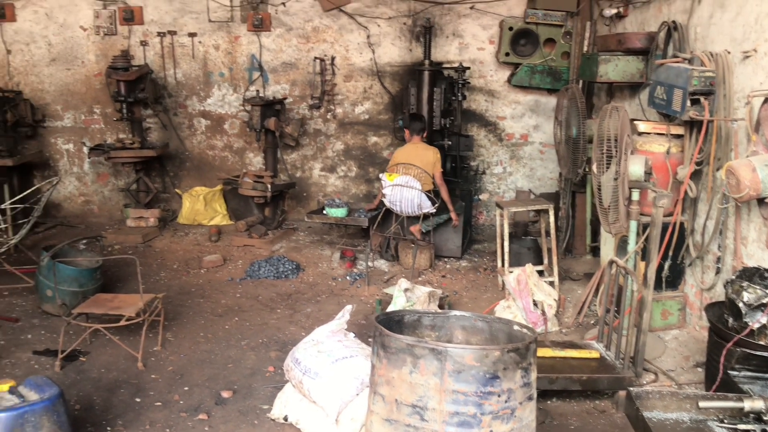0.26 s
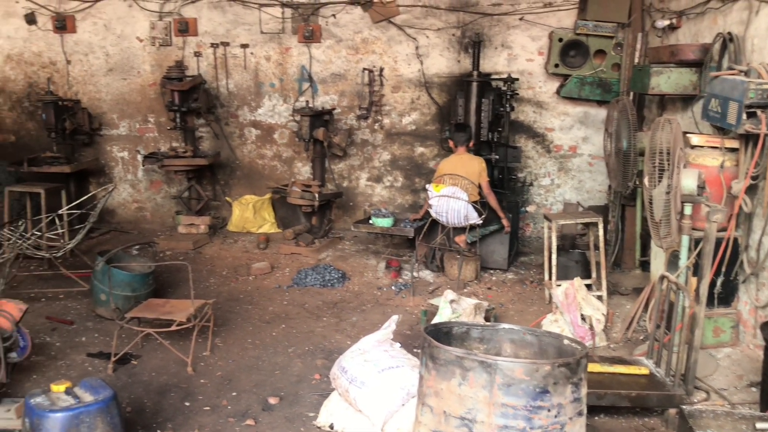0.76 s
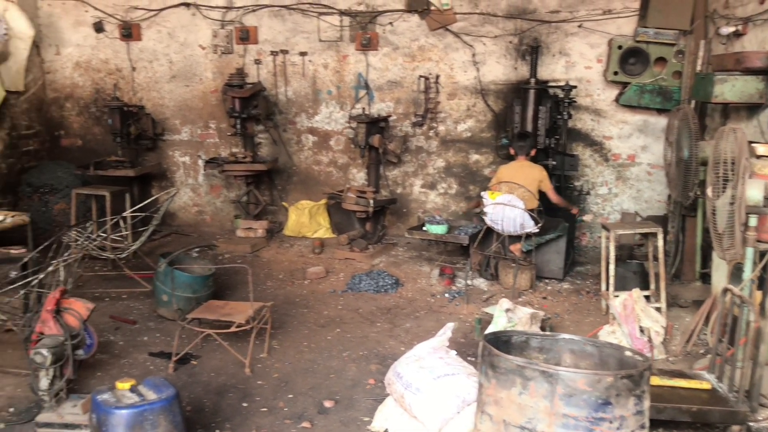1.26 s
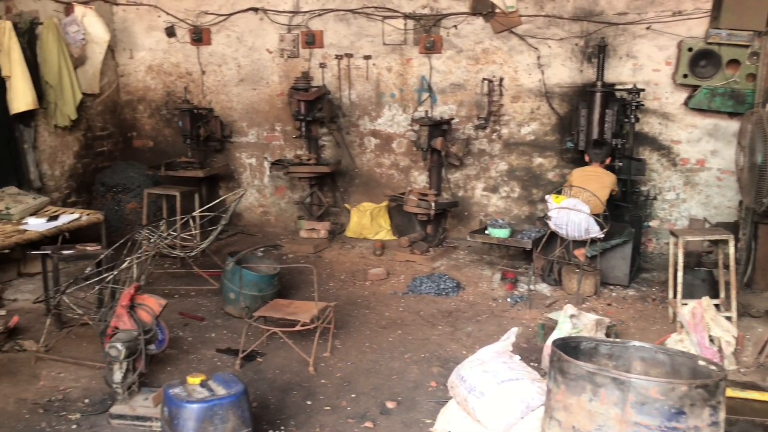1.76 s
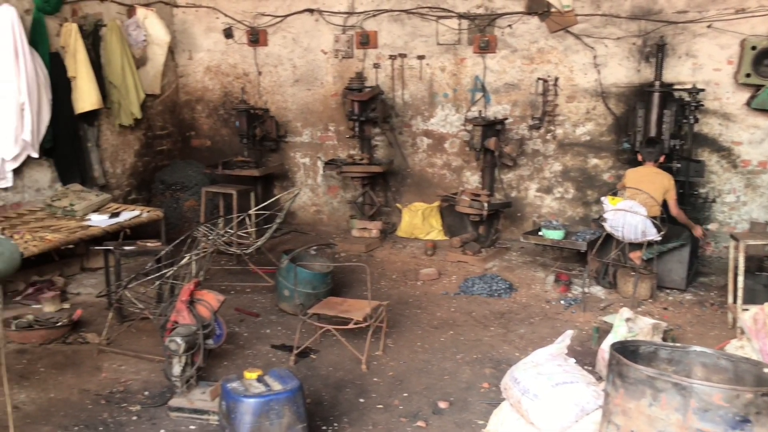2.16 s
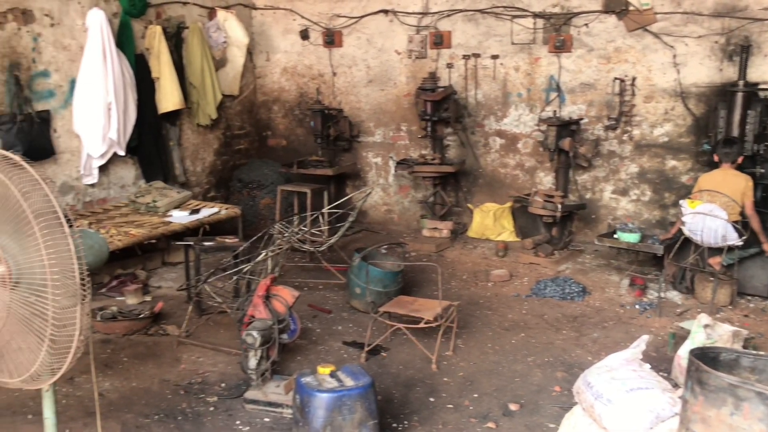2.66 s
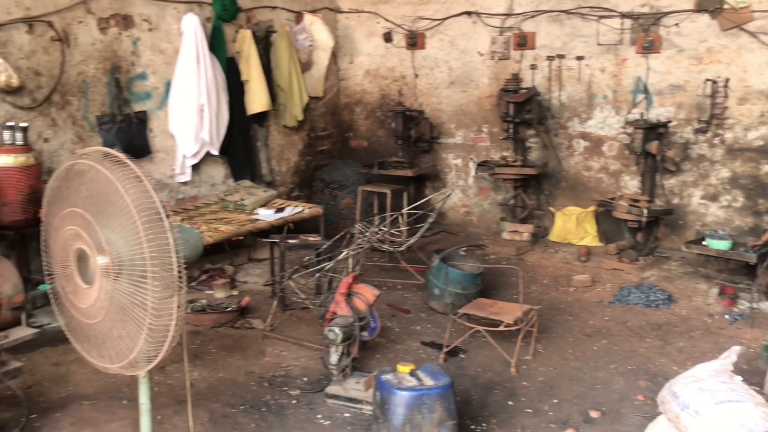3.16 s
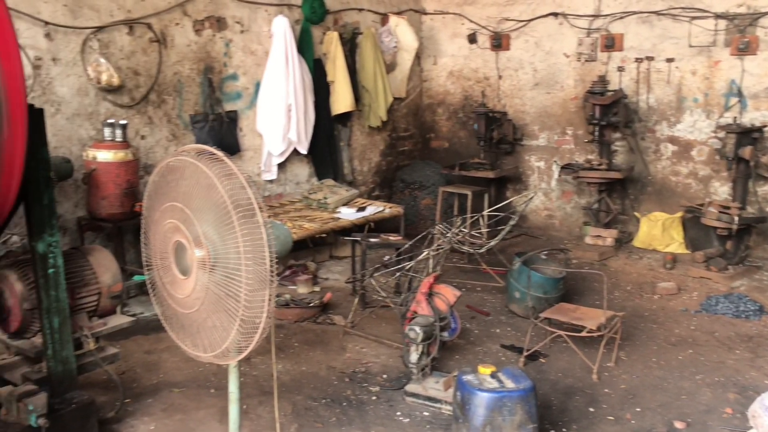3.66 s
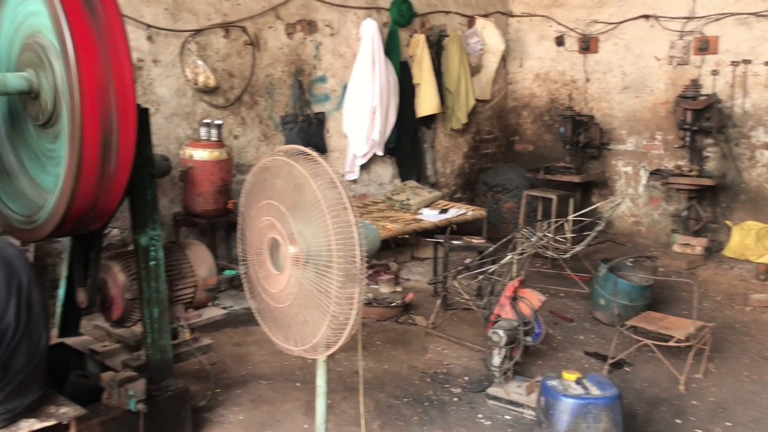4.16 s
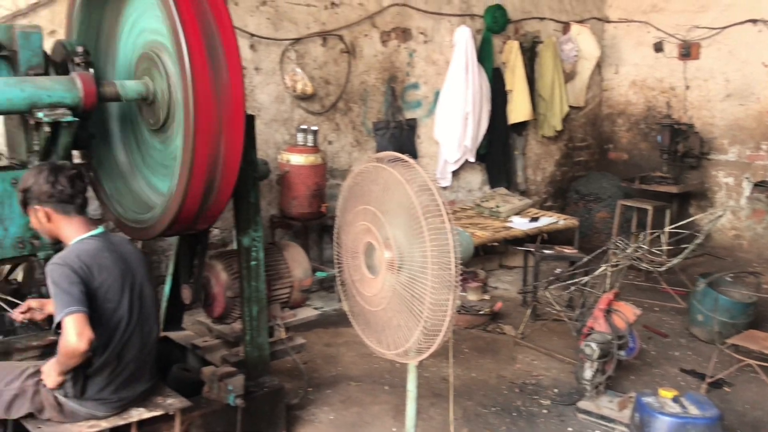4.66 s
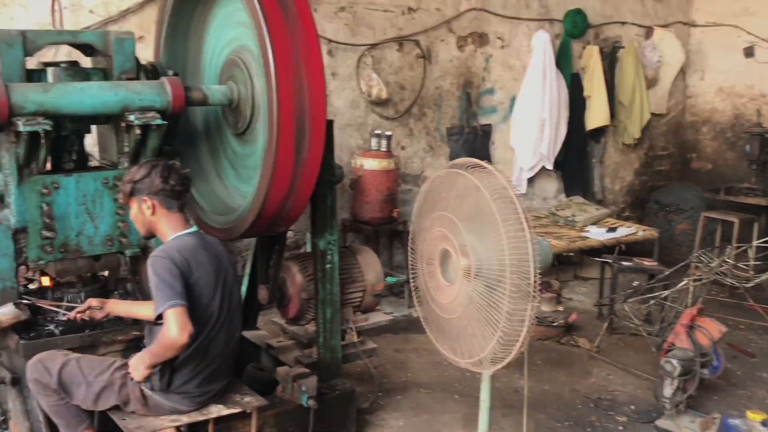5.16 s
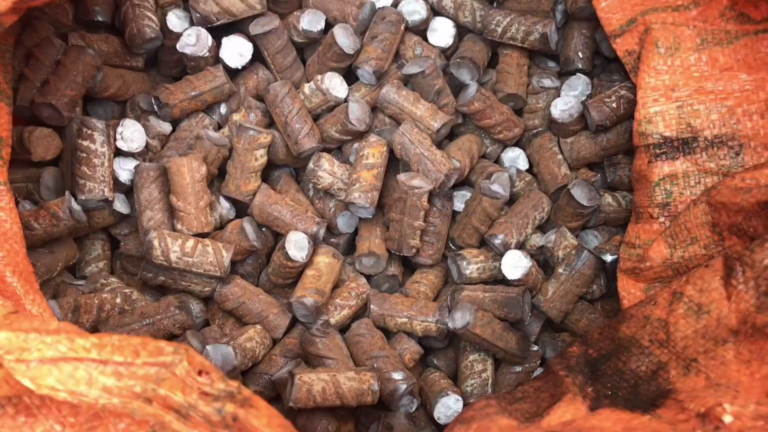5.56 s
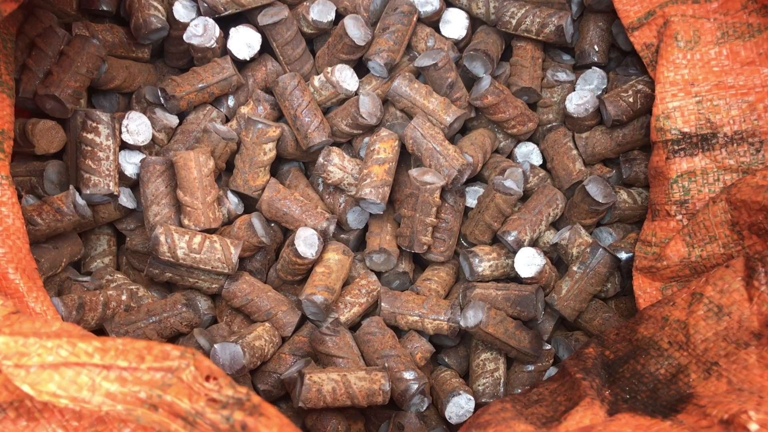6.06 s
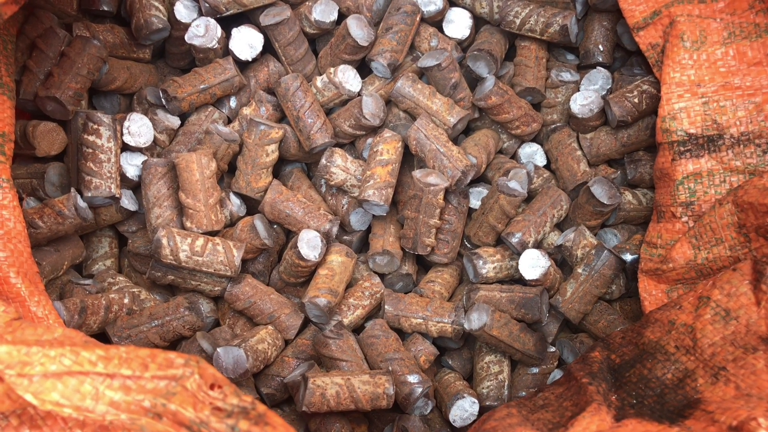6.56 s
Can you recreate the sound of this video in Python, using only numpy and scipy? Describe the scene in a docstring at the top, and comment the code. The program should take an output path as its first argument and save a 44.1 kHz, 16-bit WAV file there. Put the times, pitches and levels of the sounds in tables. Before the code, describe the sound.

A belt-driven press runs from the start in a small workshop, heard in mono with short reflections from close walls. Its motor hums and its belt hisses, while a low flywheel rumble and a bearing rattle swell gently about every 1.4 seconds. Steel bars knock, chatter and ring against the frame in irregular bursts: around 0.8 to 1.3 seconds, 2.1 to 2.6, 3.4 to 4, and 4.7 to 5.3. A loose plate rings with some blows, most clearly near 2.2 seconds. Dull bumps land around 0.3, 1.3 and 2.9 to 3.3 seconds. Bars slide with a thin hiss near 0.8, 1.6, 3.2 and 3.8 seconds. A bearing squeals faintly around 3.1, 4.4 and 4.7 seconds. At about 5.4 seconds the din cuts off abruptly, leaving only faint room tone until the end, near 7 seconds.

```python
"""Shearing press in a brick workshop

One microphone, mono, in a small shop with the walls close by. Steel bars knock, chatter and ring against
the frame of a belt-driven press in irregular bursts, and now and then slide with a thin hiss. Behind
them the motor hums, while flywheel rumble and bearing rattle swell with each stroke.
The din stops abruptly and leaves only faint room tone."""
import sys
import numpy as np
from scipy import signal
from scipy.fft import rfft, irfft
from scipy.io import wavfile
from scipy.ndimage import uniform_filter1d

SR = 44100
rng = np.random.default_rng(int(sys.argv[2]) if len(sys.argv) > 2 else 0)


def bounce(signal):
    """Save signal as a 16-bit WAV file at the path given by the first command-line argument."""
    frames = np.transpose(np.atleast_2d(signal))
    limited = np.clip(frames, -1, 1)
    pcm = np.round(limited * 32767).astype(np.int16)
    wavfile.write(sys.argv[1], SR, pcm)


N = 300762
T = np.arange(N) / SR
AGE = T[:SR * 2 // 5]  # seconds since a contact

# Ringing of the press frame and of a bar. Each row: pitch in Hz, relative level in dB, t60 in seconds.
FRAME_MODES = [(365.5, 1, 0.14), (518.7, 2.5, 0.13), (620, -6, 0.48), (655, 0.5, 0.2), (718.81, -3, 0.1),
               (856, 1, 0.14), (966, -6.5, .12), (1176, 3.5, 0.21), (1445.1, -1, 0.22), (2127, -3.5, 0.32),
               (2332, -5.5, 0.09), (2540, -11, 0.067), (2800, -3.5, 0.059)]
BAR_MODES = [(2500, 3, 0.071), (2567, 1.5, 0.15), (2715, 1.5, 0.11), (2920, -7, .1), (3783, -2.5, .16),
             (3981.2, -8, .13), (4720, -9, .12), (5280, -4.5, 0.12), (5310, -5, 0.13), (6250, -6.5, 0.18),
             (6350, -6.5, 0.13), (7100, -8.5, 0.14), (9600, -13, .1), (13170, -10.5, .09)]
# The dense, unresolved resonances of a clank. Each row: frequency in Hz, relative level in dB.
WASH_SPECTRUM = [(88, -35.5), (150, 4.5), (197, -10.5), (360, -3.5), (472, -9), (585, -7), (880, -5.5),
                 (1740, -12), (2560, 1.5), (3300, -17), (4960, -18.5), (5370, -14.5), (7760, -24.5),
                 (13100, -21.5), (15600, -32.5)]

def clank(hardness_db, ring_db):
    """Chattering steel excites frame and bar. Harder contacts trade thud for treble."""
    contacts = chatter()
    wash = colour(rng.standard_normal(len(AGE)), WASH_SPECTRUM)

    def register(lo_hz, hi_hz, t60):
        """One band of the wash, with the longer tail of the room."""
        return band(wash, lo_hz, hi_hz, order=3) * (fade(t60) + undb(-18) * fade(0.51))

    bite = undb(1.7 + 0.45 * hardness_db) * unit(register(1900, 3160, t60=0.28))
    middle = unit(register(782, 1800, t60=0.25))
    body = unit(middle + bite) + undb(-6.5) * unit(ring(FRAME_MODES))
    thud = struck(contacts, register(230, 790, t60=0.28), db=-4.5 - 0.69 * hardness_db)
    clang = struck(contacts, body, db=4)
    # the bright edge builds a little later than the body
    clash = struck(contacts, register(3000, 9000, t60=0.18), db=-2.5 + 0.52 * hardness_db, rise_s=0.008)
    tick = struck(contacts, register(9000, 15000, t60=0.083), db=-9 + 0.66 * hardness_db, rise_s=0.008)
    # the bar springs clear and rings on with its own rebounds
    rebounds = chatter(rebound=0.7)
    bar = ring(BAR_MODES, scatter_db=2, detune=0.006, walls_db=-1)
    clink = struck(rebounds, bar, ring_db, rise_s=0.006)
    return thud + (clang + clash + tick + clink) * grit()

def chatter(length_s=0.03, rebound=0.69, count=7):
    """A first contact and a few weaker rebounds."""
    contacts = np.zeros(int(length_s * SR) + 2)
    contacts[0] = 1
    for when, size in rng.random((count, 2)):
        contacts[int(when * length_s * SR) + 1] += (2 * size - 1) * np.exp(-when) * rebound
    return contacts

def ring(modes, scatter_db=-0.5, detune=0.0044, walls_t60=0.34, walls_db=0):
    """Each blow reweights and detunes the modes; the microphone hears them direct and off the walls."""
    partials = np.array([undb(db) * fade(t60) * np.exp(2j * np.pi * hz * AGE) for hz, db, t60 in modes])
    size, phase, shift = rng.standard_normal((3, len(modes)))
    weights = undb(scatter_db * size) * np.exp(2j * np.pi * phase)
    tone = (weights[:, None] * partials).imag.sum(axis=0)
    direct = np.interp(AGE * (1 + detune * shift[0]), AGE, tone)
    return unit(direct) + undb(walls_db) * unit(reflections(direct, walls_t60))

def struck(contacts, body, db, rise_s=0.0032):
    """A body's answer to all contacts takes a moment to build; its level is set on the first 40 ms."""
    build = 1 - np.exp(-AGE / rise_s)
    answer = signal.fftconvolve(contacts, body * build)[:len(AGE)]
    return undb(db) * unit(answer, count=1764)

def grit(spread_db=1.3, catch_s=0.004):
    """Tiny catches make the level uneven as steel grates during a blow."""
    sizes = rng.standard_normal(512)
    return undb(spread_db * np.interp(AGE / catch_s, np.arange(len(sizes)), sizes))

# Bars striking the press. Each row: start in seconds, strength in dB, hardness of the contact in dB,
# free ring of the bar in dB relative to the strength.
BAR_BLOWS = [(.146, -36, -16, -15), (.252, -31, -17, -19.5), (.763, -19, -4, -16), (.792, -20, 7, -6),
             (.827, -18.5, -6, -14), (.856, -22.5, -3, -15.5), (.937, -23.5, -8.5, -10),
             (1.196, -19, -3.5, -3.5), (1.233, -22, 5, 1), (1.27, -22, -8, -3.5), (1.318, -18, 1, -9.5),
             (1.486, -34.5, -22, -10), (1.643, -29, 13, -19), (2.088, -26.5, 11.5, -1.5),
             (2.109, -24, 16, 3), (2.224, -20, 0, -2.5), (2.29, -31, 3, 2.5), (2.353, -20, -7, -11),
             (2.391, -23, 11, -3), (2.434, -20, -4.5, -7.5), (2.465, -23, 3, -6.5), (2.589, -20, -4.5, -23),
             (2.805, -36, -9, -10.5), (2.856, -28, -7, -11.5), (2.924, -28.5, -11.5, -20),
             (3.427, -22, -8, -10.5), (3.452, -21, 6.5, -2.5), (3.494, -18, -5, -18.5),
             (3.53, -21.5, 5, -12), (3.564, -25.5, -2, -3), (3.675, -30, 3, -6), (3.84, -22.5, 3, -5.5),
             (3.884, -19, 4, 1.5), (3.929, -22, -1.5, 0.5), (3.986, -16.5, -6, -15),
             (4.317, -30.5, 17, -14), (4.706, -19.5, -2, -9), (4.946, -20, -7, -20.5),
             (4.966, -23, 5, -4.5), (5.071, -16.5, 4.5, -12.5), (5.11, -20, -8, -14.5),
             (5.255, -19, -7, -12.5), (5.274, -23, -9.5, -19), (5.368, -31, 9, -17.5)]

def bar_blows():
    """Steel bars knock against the frame in irregular bursts."""
    out = np.zeros(N)
    for start, db, hardness_db, ring_db in BAR_BLOWS:
        add(out, start, undb(db) * clank(hardness_db, ring_db))
    return out

# Ringing of a steel plate. Each row: pitch in Hz, relative level in dB, t60 in seconds.
PLATE_MODES = [(852, -2, 0.32), (937, -5, .15), (1340, -1.5, .18), (1525, -7, 0.22), (2560, 5.5, 0.055)]
# Knocks on that plate. Each row: start in seconds, level in dB.
PLATE_KNOCKS = [(.827, -31), (1.233, -26), (2.108, -19.5), (2.223, -16), (2.246, -28.5), (2.465, -23),
                (3.494, -24), (3.841, -19.5)]

def loose_plate():
    """A loose plate is caught, chatters and rings."""
    out = np.zeros(N)
    for start, db in PLATE_KNOCKS:
        add(out, start, struck(chatter(), ring(PLATE_MODES), db))
    return out

# A bar sliding over steel. Each row: start in seconds, length in seconds, level in dB.
BAR_SLIDES = [(.79, 0.22, -19.5), (1.51, 0.13, -27), (1.617, 0.093, -24.5), (3.107, 0.1264, -30),
              (3.167, 0.15, -17), (3.788, 0.1506, -23.5), (4.146, 0.15, -36)]

def bar_slides():
    """Tiny catches of the ribbed surface hiss as a bar starts quickly, then slows down."""
    out = np.zeros(N)
    for start, length_s, db in BAR_SLIDES:
        friction = rng.standard_normal(len(AGE))
        catches = friction * undb(2 * np.repeat(rng.standard_normal(len(AGE)), 100)[:len(AGE)])
        hiss = unit(band(catches, 11300, 14000)) + undb(-11) * unit(band(catches, 3500, 7800))
        speed = (1 - np.exp(-AGE / 0.01)) * np.exp(-2 * (AGE / length_s) ** 2)
        add(out, start, undb(db) * speed * hiss)
    return out

# Dull bumps of the press bed. Each row: start in seconds, pitch in Hz, level in dB.
BED_BUMPS = [(0.283, 257, -12.5), (.693, 246, -29), (.94, 300.9, -27), (1.29, 305, -8), (2.928, 272, -9.5),
             (3.185, 185.3, -12), (3.25, 310, -12)]

def bed_bumps(t60=0.1, rise_s=0.003):
    """A soft heavy contact swings one low, well damped resonance."""
    out = np.zeros(N)
    for start, hz, db in BED_BUMPS:
        swing = np.sin(2 * np.pi * hz * AGE) * fade(t60) * (1 - np.exp(-AGE / rise_s))
        add(out, start, undb(db) * swing)
    return out

def drive(stroke_s=1.353, full_load_s=1.023):
    """Rumble, rattle and hiss swell with the load once a stroke; rumble and rattle briefly ease off."""
    load = np.cos(2 * np.pi * (T - full_load_s) / stroke_s)
    ease = swell(peak_s=4.5, half_s=0.33)
    rumble = undb(-25 + 1.4708 * load - ease) * flywheel_rumble()
    rattle = undb(-24.5 + 2 * load - 3.5 * ease) * bearing_rattle()
    hiss = undb(-34 + 1.7 * load) * belt_hiss()
    return rumble + rattle + hiss

# Resonances of flywheel, belt and frame. Each row: centre in Hz, width in Hz, relative gain in dB.
RUMBLE_BANDS = [(54.8, 9.9, 0.5), (90, 15, 1.5), (113, 9.2, 2.5), (130.4, 18, 1), (188.8, 90, -3.5),
                (226.4, 16, -5.5), (277.6, 16, 1.5), (308, 36, 0.5), (365, 24, -0.5), (427.21, 80, -5.5)]

def flywheel_rumble():
    """Flywheel, belt and frame rumble in low bands of noise."""
    rumble = sum(undb(db) * band(rng.standard_normal(N), hz - width / 2, hz + width / 2, order=1)
                 for hz, width, db in RUMBLE_BANDS)
    return unit(band(rumble, 38, 480, order=3))

# Rattle of the bearings. Each row: frequency in Hz, relative level in dB.
RATTLE_SPECTRUM = [(400, -22), (500, -8), (585, 4), (670, 2), (750, -3.5), (870, -1.5), (1400, -1.5),
                   (1700, -4.5), (2100, -5), (2650, -9.5), (3000, -13), (4200, -17.5), (6000, -45.5)]

def bearing_rattle(knocks_per_s=1500, flutter_db=1.48):
    """Loose bearings make dense little knocks, blurred by the walls on their way to the microphone."""
    knocks = (rng.random(N) < knocks_per_s / SR) * rng.uniform(-0.95, 1, N)
    blurred = unit(reflections(knocks, t60=0.1))
    return colour(blurred + rng.standard_normal(N), RATTLE_SPECTRUM) * undb(flutter_db * wander(22))

# Hiss of the belt. Each row: frequency in Hz, relative level in dB.
BELT_SPECTRUM = [(2500, -22), (4000, -5), (5800, 0), (7500, -4), (9800, -3), (11200, -1), (13200, 3),
                 (14200, -3.5), (15800, -15)]

def belt_hiss(flutter_db=0.3):
    """The running belt hisses with a slight flutter."""
    return colour(rng.standard_normal(N), BELT_SPECTRUM) * undb(flutter_db * wander(25))

def boom(hz=54, db=-28.5):
    """A deep boom swells under the last of the din."""
    noise = unit(band(rng.standard_normal(N), hz - 7, hz + 7))
    return undb(db) * swell(peak_s=5.38, half_s=0.095) * noise

# Squeals of a dry bearing. Each row: loudest moment in seconds, half length in seconds, level in dB.
BEARING_SQUEALS = [(3.1, .16, -35), (4.38, 0.14, -33), (4.66, 0.092, -30)]

def bearing_squeal(hz=1400, waver=0.0035, flutter_db=4):
    """Dry friction keeps one narrow resonance singing unevenly."""
    phase = 2 * np.pi * np.cumsum(hz * (1 + waver * wander(90))) / SR
    song = unit(np.sin(phase) * undb(flutter_db * wander(45)))
    return song * sum(undb(db) * swell(peak_s, half_s) for peak_s, half_s, db in BEARING_SQUEALS)

# Hum of the motor. Each row: multiple of the magnetic pull's frequency, level in dB.
MOTOR_HARMONICS = [(6, -47), (8, -44), (10, -41), (11, -52), (12, -43.5), (13, -52.5), (14, -44.5),
                   (16, -49.5)]

def motor_hum(pull_hz=100.14):
    """Harmonics of the motor's magnetic pull waver in pitch and level."""
    phase = 2 * np.pi * np.cumsum(pull_hz * (1 + 0.0015 * wander(6))) / SR
    return sum(undb(db + 1.1 * wander(11)) * unit(np.sin(multiple * phase + 0.7 * wander(14)))
               for multiple, db in MOTOR_HARMONICS)

# The quiet workshop. Each row: frequency in Hz, relative level in dB.
ROOM_SPECTRUM = [(15, -51), (25, -21), (75, -1.5), (104, -10.5), (140, -8.5), (247, -9.5), (275, -8.5),
                 (497, -13.5), (1120, -13.5), (1860, -17.5), (4290, -21.5), (4910, -23.5), (5620, -23),
                 (15600, -29.5)]

def room_tone(db=-58.5):
    """Faint, low noise around the microphone once the press is still."""
    return undb(db) * colour(rng.standard_normal(N), ROOM_SPECTRUM)

def reflections(x, t60):
    """Close brick walls smear x into a short, dense tail."""
    return signal.fftconvolve(x, rng.standard_normal(len(AGE)) * fade(t60))[:len(x)]

def undb(db):
    """Decibels to gain."""
    return 10 ** (np.asarray(db) / 20)

def unit(x, count=None):
    """Scale to rms 1, judged on the first count samples."""
    return x / np.sqrt(np.mean(x[:count] ** 2) + 1e-18)

def colour(x, points):
    """Shape the spectrum of x through (Hz, dB) points, at rms 1."""
    hz, db = np.transpose(points)
    bins_hz = np.maximum(np.arange(len(x) // 2 + 1) * SR / len(x), 1)
    gain = undb(np.interp(np.log(bins_hz), np.log(hz), db))
    return unit(irfft(rfft(x) * gain, len(x)))

def band(x, lo_hz, hi_hz, order=2):
    """Band-pass filter."""
    return signal.sosfilt(signal.butter(order, [lo_hz, hi_hz], "band", fs=SR, output="sos"), x)

def wander(rate_hz):
    """Smooth random drift at rms 1."""
    hold = int(SR / rate_hz)
    steps = np.repeat(rng.standard_normal(N // hold + 1), hold)
    return unit(uniform_filter1d(uniform_filter1d(steps, hold), hold)[:N])

def fade(t60):
    """Decay by 60 dB in t60 seconds."""
    return np.exp(-np.log(1000) * AGE / t60)

def swell(peak_s, half_s):
    """A smooth rise and fall around peak_s."""
    return np.exp(-((T - peak_s) / half_s) ** 2)

def add(out, start_s, x):
    """Mix x into out from start_s on."""
    i = int(start_s * SR)
    out[i:i + len(x)] += x[:N - i]

def scene(stop_s=5.381, quiet_s=5.425):
    """The working shop stops abruptly and leaves a quiet room, the same in both channels."""
    steel = bar_blows() + loose_plate() + bar_slides() + bed_bumps()
    shop = steel + drive() + boom() + bearing_squeal() + motor_hum()
    running = np.clip((stop_s - T) / 0.002, 0, 1)
    stopped = np.clip((T - quiet_s) / 0.004, 0, 1)
    return np.tile(shop * running + room_tone() * stopped, (2, 1))

# Dips of the microphone port. Each row: centre in Hz, width in Hz.
PORT_DIPS = [(4950, 77), (7750, 93), (10450, 250)]

def record(dry, ceiling=0.79, top_hz=15500):
    """The microphone port dents the treble, the loudest peaks are rounded and the top is cut."""
    for hz, width in PORT_DIPS:
        dry = signal.lfilter(*signal.iirnotch(hz, hz / width, fs=SR), dry)
    rounded = dry / (1 + (dry / ceiling) ** 4) ** (1 / 4)
    return signal.sosfilt(signal.ellip(10, 0.2, 80, top_hz, fs=SR, output="sos"), rounded)

dry = scene()
out = record(dry)
bounce(out)
```